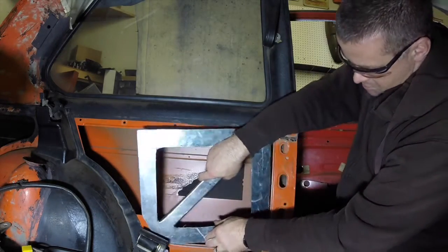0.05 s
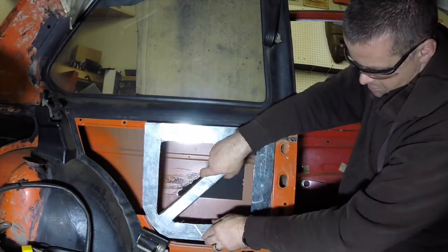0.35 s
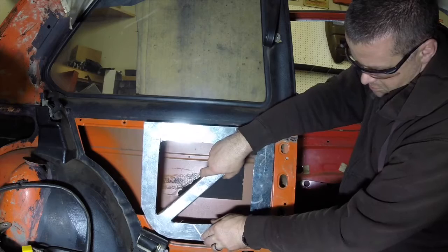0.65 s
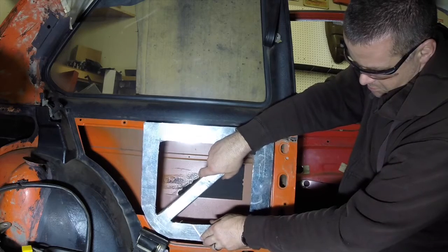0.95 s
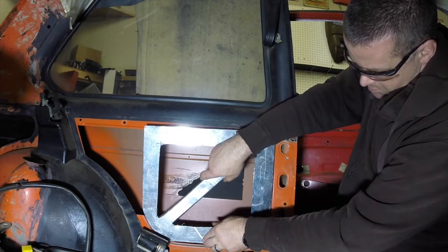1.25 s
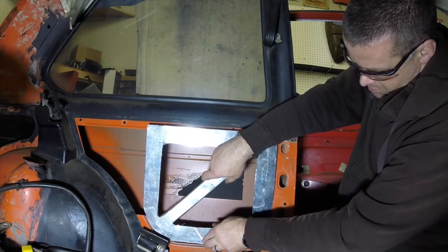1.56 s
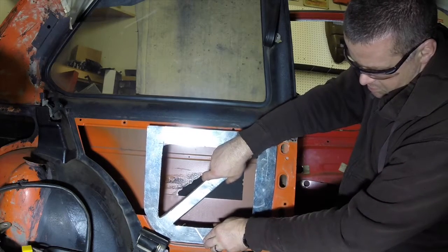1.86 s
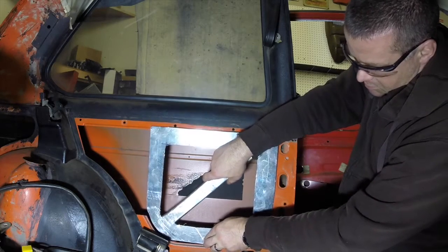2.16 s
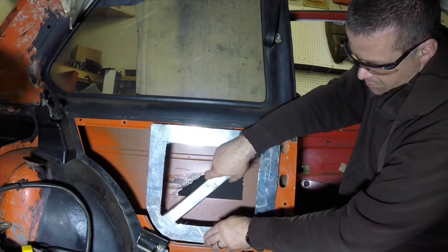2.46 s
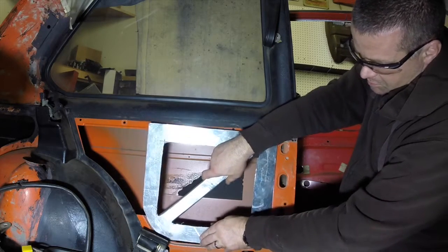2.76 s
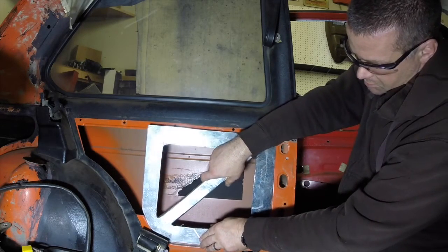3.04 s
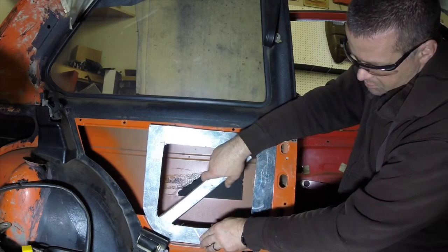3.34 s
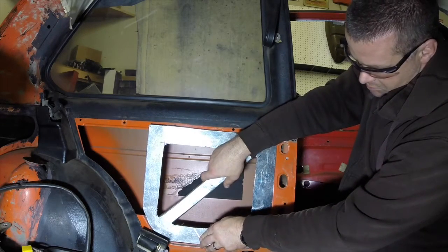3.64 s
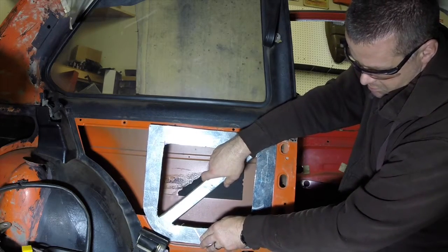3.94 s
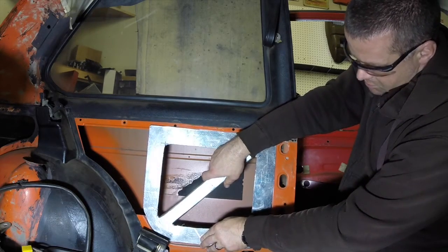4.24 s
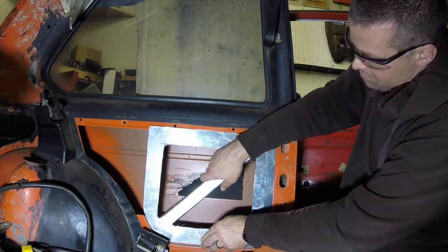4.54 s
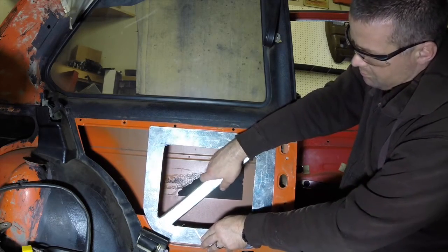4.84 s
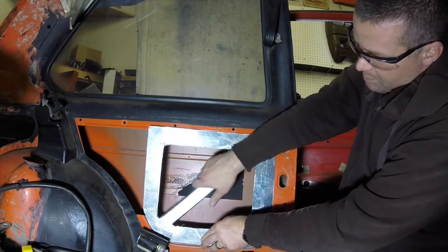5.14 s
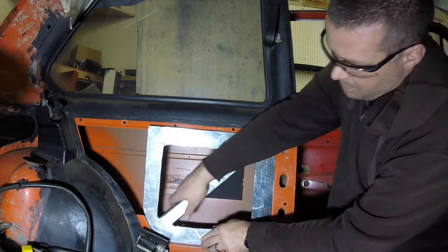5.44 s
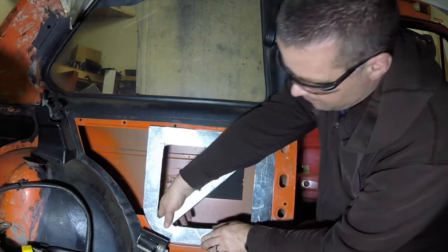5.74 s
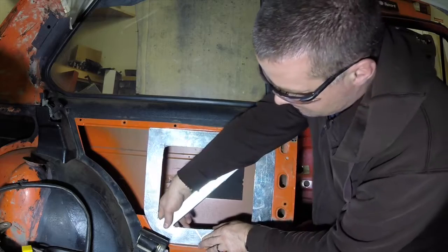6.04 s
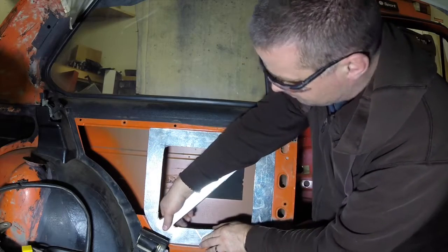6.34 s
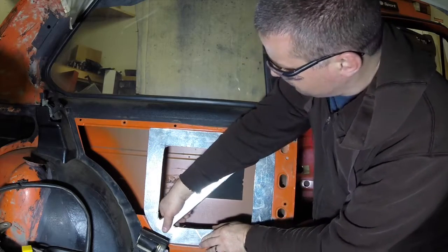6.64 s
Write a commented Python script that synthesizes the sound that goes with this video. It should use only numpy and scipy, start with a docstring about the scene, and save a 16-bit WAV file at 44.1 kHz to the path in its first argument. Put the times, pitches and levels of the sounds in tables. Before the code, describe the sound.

Irregular metallic knocks and scrapes sound close by as a brace is shifted against a hollow car body panel. The metal rings briefly while loose, and the panel booms when pressed. The knocks come in clusters, with dull rubbing between them and a faint hiss of a palm sliding on metal before a deep thump near the end. A short garage reverberation and quiet room noise lie underneath.

```python
"""Fitting a brace into a car body.

In a garage, a sheet-metal brace is shifted and pressed into the side panel of a bare body shell.
Each knock shakes panel and cabin: the brace rings while loose, the panel booms once it is pressed.
Edges scrape in tiny slips, rubbing comes and goes, a palm slides. Hard blows overload the microphone."""
import sys
import numpy as np
from scipy import signal
from scipy.fft import rfft, irfft, next_fast_len
from scipy.io import wavfile
from scipy.ndimage import uniform_filter1d

SR = 44100
rng = np.random.default_rng(int(sys.argv[2]) if len(sys.argv) > 2 else 0)


def master(y):
    """Save y as 16-bit WAV."""
    cut = np.clip(np.atleast_2d(y).T, -1, 1)
    pcm = np.round(cut * 32767)  # scale
    wavfile.write(sys.argv[1], SR, pcm.astype(np.int16))


N = 295293
RING_SAMPLES = 32768
STRIKE_SPREAD_DB = 3.5  # scatter per mode and per slip

# garage background (frequency [Hz], relative density [dB])
AIR_SPECTRUM = [(12, -29), (20, 1.5), (95, -2), (219, -7.5), (744, -6.5), (809, -10.5), (1260, -10.5),
                (1490, -14.5), (2080, -16), (2680, -19.5), (3160, -21), (6710, -33), (8860, -39),
                (14200, -45.5), (15400, -58)]
# palm on the brace (start [s], length [s], level [dB])
PALM_STROKES = [(0.84, 0.49, -75), (5.02, 0.12, -62), (5.36, 0.5, -53.5), (6.32, 0.04, -53.5)]
# skin friction (frequency [Hz], relative density [dB])
SKIN_SPECTRUM = [(500, -20), (2500, 11), (6000, 7), (11000, -1), (15000, -16)]
# rubbing; the loudest is a rough noise under the juddering knocks (start [s], length [s], level [dB])
RUB_STROKES = [(1.007, 0.27, -44), (1.641, 0.09, -35.5), (1.947, 0.31, -28), (3.892, 0.16, -45),
               (4.55, 0.42, -43.5), (4.973, 0.45, -38.5), (5.337, 1, -38.5), (6.1, 0.33, -42)]
# rubbing noise (frequency [Hz], relative density [dB])
RUB_SPECTRUM = [(100, 6.5), (400, 23), (1200, 13), (3000, 2.5), (7000, -16.5), (11500, -23.5),
                (16000, -28.5)]
# garage reverberation (frequency [Hz], t60 [s])
GARAGE_T60 = [(60, 0.27), (350, 0.99), (1200, 0.39), (4000, 0.31), (12000, 0.22)]
# dense body-shell modes (frequency [Hz], relative density [dB])
SHELL_SPECTRUM = [(30, -38), (60, -9.5), (120, 2.5), (175, -11.5), (215, -17), (270, 4.5), (380, 0),
                  (520, -2), (680, -6.5), (1200, -10.5), (1530, -9.5), (2100, -13), (3200, -15.5),
                  (5000, -30.5), (10000, -53), (15400, -71.5)]
# their early decay (frequency [Hz], t60 [s])
SHELL_T60 = [(60, 0.19), (160, 0.4), (380, 0.24), (900, 0.22), (2000, 0.15), (4500, 0.1), (9000, 0.094),
             (15000, 0.095)]
# side panel (frequency [Hz], relative level [dB], t60 [s])
PANEL_MODES = [(52.6, -19.5, 1), (64.4, -8.5, 0.78), (96, -29, .5), (136, -13.5, 0.8), (187.7, -14.5, 0.26),
               (208, -6, 0.12), (266.7, 1, 0.17), (311.2, -4.5, 0.32), (348, -0.5, 0.32), (398.6, 4, 0.13),
               (414, 4, 0.071), (431.6, -5, 0.29)]
# loose brace (frequency [Hz], relative level [dB], t60 [s])
LOOSE_MODES = [(614, -7, .2), (678, -6, .2), (725, -9, .17), (785, -7, .18), (855, -7, .28),
               (889, -2.5, .33), (1015, -11, .22), (1124, -2.5, .3), (1186, -4.5, .28), (1238, -8, .2),
               (1418, -9, .22), (1674, -13, .18), (1782, -13, .18), (2135, -8.5, .48), (2180, -17, .22),
               (2272, -18, .2), (2728, -14, .33), (2821, -24, .75), (2912, -21, .25), (3020, -20, .2),
               (3182, -19, .2), (4339, -29, .22), (5696, -35, .35)]
# brace pressed to the panel (frequency [Hz], relative level [dB], t60 [s])
SEATED_MODES = [(495, -5, .26), (558, -8, .22), (636, -4, .2), (660, -5, .2), (700, -9, .15),
                (790, -10, .13), (860, -9, .15), (910, -9, .19), (1001, -6, .2), (1093, -6, .24),
                (1135, -6, .16), (1195, -7, .16), (1314, -9, .17), (1410, -11, .17), (1647, -10, .18),
                (1814, -9, .19), (2013, -15, .16), (2223, -15, .15), (2304, -13, .18), (2525, -15, .16),
                (3138, -19, .15), (3424, -19, .16)]
# play of the brace (time [s], freedom [0 pressed home, 1 loose])
BRACE_FREEDOM = [(0, 0.8), (1.0, 0.49), (1.3, 0.22), (2.1, 0.067), (2.3, 0.51), (2.65, 0.43), (3.0, 0.075),
                 (5.2, 0.02), (6.0, 0.43)]
# edge sliding on the panel (start [s], rise time [s], peak level [dB])
SCRAPE_STROKES = [(0.0, 0.016, -16), (0.879, 0.029, -30), (2.46, 0.14, -16), (5.03, 0.12, -38)]
# slip force (frequency [Hz], relative level [dB])
SLIP_SPECTRUM = [(100, -17), (400, 1), (900, 1), (2150, 3.5), (3300, 4), (5500, 11), (8000, 19.5),
                 (14000, 26)]
# limits of the boom, clunk, clang, edge and click bands (frequency [Hz])
KNOCK_BANDS_HZ = [40, 180, 700, 2500, 6500, 15000]
# share of a knock, one row per band, clunk to click (padded push [dB], firm blow [dB], bare edge [dB])
CONTACT_SHARES_DB = [(6, 1.5, -5.5), (-3.5, 0, 0), (-36.5, -14, -3), (-55.5, -39.5, -3)]
# panel boom at a full blow, growing as the brace is leaned on (time [s], level [dB])
FULL_BOOM = [(0.08, -33), (0.2, -30.5), (0.6, -50), (1.75, -43.5), (2.1, -32), (2.9, -36.5), (3.3, -32),
             (4.0, -31), (4.5, -26.5), (5.2, -22), (5.5, -36), (5.85, -28.5), (6.4, -21)]
# brace hitting the panel (time [s], strength [dB], hardness [0 padded push, 1 bare edge])
BRACE_KNOCKS = [(0.081, -29.5, 0.56), (0.172, -15.0, 0.65), (0.204, -11, 0.48), (0.221, -21, 0.85),
                (0.268, -22.5, 0.62), (0.324, -31.5, 0.57), (0.569, -25, 0.49), (0.729, -37, 0.22),
                (0.865, -29, 0.52), (1.125, -42.5, 0.71), (1.191, -26.5, 0.67), (1.214, -26.5, 0.2),
                (1.349, -36, 0.4), (1.403, -34.5, 0.39), (1.526, -42, 0.18), (1.721, -20.0, 0.46),
                (1.74, -25, 0.026), (1.771, -25, 0.55), (2.015, -27.5, 0.51), (2.056, -18.5, 0.3),
                (2.101, -18.5, 0.33), (2.119, -20.5, 0.04), (2.167, -21, 0.11), (2.193, -32, 0.082),
                (2.3, -17.5, 0.74), (2.33, -8.5, 0.69), (2.428, -27.5, 0.083), (2.576, -20.5, 0.77),
                (2.632, -17, 0.59), (2.884, -13, 0.096), (2.897, -23.5, 0.39), (2.958, -17, 0.62),
                (3.166, -26.5, 0.53), (3.177, -17, 0.52), (3.32, -30.5, 0.19), (3.933, -37.5, 0.4),
                (4.02, -16.5, 0.17), (4.132, -22, 0.19), (4.226, -20.0, 0.68), (4.289, -19, 0.54),
                (4.336, -27, 0.52), (4.449, -18.5, 0.55), (4.541, -18.0, 0.67), (4.71, -22.0, 0.23),
                (4.865, -41, 0.31), (5.173, -26.0, 0.04), (5.197, -13.5, 0.62), (5.406, -40.0, 0.25),
                (5.49, -34.5, 0.59), (5.807, -24, 0.61), (5.849, -23, 0.13), (5.947, -33.5, 0.26),
                (6.006, -7.5, 0.12), (6.021, -18.5, 0.36), (6.038, -23, 0.37), (6.138, -20.5, 0.29),
                (6.327, -45.5, 0.39), (6.429, -46, 0.086)]


def gain_of(db):
    """Decibels to amplitude."""
    return 10 ** (np.asarray(db) / 20)


def unit_rms(x):
    """Scale to rms 1."""
    return x / np.sqrt(np.mean(x ** 2) + 1e-20)


def at_hz(table, hz):
    """Table lookup over log frequency."""
    table_hz, values = np.transpose(table)
    return np.interp(np.log(hz + 1), np.log(table_hz + 1), values)


def at_time(table, time_s):
    """Table lookup over time."""
    return np.interp(time_s, *np.transpose(table))


def add(mix, start_s, sound):
    """Mix a sound in place."""
    part = mix[max(round(start_s * SR), 0):][:len(sound)]
    part += sound[:len(part)]


def colour(x, spectrum):
    """Minimum-phase filter from (frequency [Hz], gain [dB]) points."""
    size = next_fast_len(len(x) + RING_SAMPLES // 8)
    log_gain = np.log(gain_of(at_hz(spectrum, abs(np.fft.fftfreq(size, 1 / SR)))))
    response = np.exp(np.conj(signal.hilbert(log_gain)))[:size // 2 + 1]
    return irfft(rfft(x, size) * response, size)[:len(x)]


def garage_air(level_db=-43.5):
    """Steady background noise."""
    return gain_of(level_db) * unit_rms(colour(rng.standard_normal(N), AIR_SPECTRUM))


def catches(samples, smooth_samples=400):
    """Random waver of friction as a surface catches; rms 1."""
    return unit_rms(uniform_filter1d(rng.standard_normal(samples), smooth_samples))


def friction(strokes, spectrum, grain_db, smooth_samples):
    """Grainy noise; each stroke fades in, holds, fades out."""
    pressure = np.zeros(N)
    for start_s, length_s, level_db in strokes:
        add(pressure, start_s, gain_of(level_db) * signal.windows.tukey(int(length_s * SR), 0.6))
    grain = gain_of(grain_db * catches(N, smooth_samples))
    return pressure * unit_rms(colour(grain * rng.standard_normal(N), spectrum))


def palm():
    """Skin slides on bare metal: a fine hiss."""
    return friction(PALM_STROKES, SKIN_SPECTRUM, grain_db=3.0, smooth_samples=600)


def rubs():
    """Rough, dull rubbing noise between and under the knocks."""
    return friction(RUB_STROKES, RUB_SPECTRUM, grain_db=2.5, smooth_samples=400)


def diffuse_ring(t60_table, hold_s):
    """Dense modes or reflections as noise: brief hold, then decay per band."""
    hz, t, bands = signal.stft(rng.standard_normal(RING_SAMPLES), SR, nperseg=256)
    fade = np.exp(-np.log(1000) * np.maximum(t - hold_s, 0) / at_hz(t60_table, hz)[:, None])
    return signal.istft(bands * fade, SR)[1][:RING_SAMPLES]


def modal_ring(modes, spread_db, rise_s, damping=1):
    """Decaying sines; levels vary with the contact point."""
    t = np.arange(RING_SAMPLES) / SR
    hz, level_db, t60_s = np.transpose(modes)[:, :, None]
    amplitude = gain_of(level_db + spread_db * rng.standard_normal(hz.shape))
    phase = 2 * np.pi * (hz * t + rng.random(hz.shape))
    fade = np.exp(-np.log(1000) * damping * t / t60_s)
    return (amplitude * fade * np.sin(phase)).sum(0) * (1 - np.exp(-t / rise_s))


def body_shell(garage_db=-13.5, tick_db=7.5, ripple_db=3.7, ripple_step_hz=50):
    """Contact tick, dense shell modes and garage tail; onset at rms 1."""
    ring = diffuse_ring(SHELL_T60, hold_s=0.013)
    ring += gain_of(garage_db) * diffuse_ring(GARAGE_T60, hold_s=0.0068)
    ring[0] += gain_of(tick_db)
    # each contact point feeds some resonances and misses others, more so above the bass
    hz = np.arange(0, SR / 2, ripple_step_hz)
    coupling_db = ripple_db * hz / (hz + 400) * rng.standard_normal(len(hz))
    ring = colour(ring, np.transpose([hz, at_hz(SHELL_SPECTRUM, hz) + coupling_db]))
    return ring / np.std(ring[:RING_SAMPLES // 16])


def metal_response(time_s, shell_db, seated_db=2.0, grip=0.95):
    """Shell, brace and panel after one contact; pressing trades loose modes for seated ones."""
    freedom = at_time(BRACE_FREEDOM, time_s)
    damping = 1 + grip * (1 - freedom)  # pressure chokes the loose ring
    shell = gain_of(shell_db) * body_shell()
    loose = np.sqrt(freedom) * modal_ring(LOOSE_MODES, STRIKE_SPREAD_DB, rise_s=0.00057, damping=damping)
    seated = np.sqrt(1 - freedom) * modal_ring(SEATED_MODES, STRIKE_SPREAD_DB, rise_s=0.0032)
    panel = modal_ring(PANEL_MODES, spread_db=4.5, rise_s=0.0079)
    return shell + loose + gain_of(seated_db) * seated + panel


def scrapes(slips_per_s=350, swell_db=13.5, release_db_per_s=303, catch_db=2.5):
    """Irregular edge slips keep the metal ringing; each stroke swells, catches, lets go."""
    out = np.zeros(N)
    samples = RING_SAMPLES // 2
    t = np.arange(samples) / SR
    for start_s, rise_s, peak_db in SCRAPE_STROKES:
        force_db = peak_db + np.minimum(swell_db * (t / rise_s - 1), release_db_per_s * (rise_s - t))
        slip_db = catch_db * catches(samples) + STRIKE_SPREAD_DB * rng.standard_normal(samples)
        signs = rng.choice([-1, 1], samples)
        slipping = rng.random(samples) < slips_per_s / SR
        force = gain_of(force_db) * unit_rms(gain_of(slip_db) * signs * slipping)
        ring = colour(metal_response(start_s, shell_db=-6.5), SLIP_SPECTRUM)
        add(out, start_s, signal.fftconvolve(force, ring / np.linalg.norm(ring)))
    return out


def knock(time_s, strength_db, hardness, full_blow_db=-23.5, boom_slope=0.93, thud=0.23, roll_off=0.36):
    """A padded push feeds the low bands, a bare edge the high ones; the panel booms under both."""
    ring = metal_response(time_s, shell_db=0.0)
    onset = ring[:RING_SAMPLES // 16]
    hz, power = signal.periodogram(onset, SR, window=("tukey", 0.1), scaling="spectrum")
    onset_db = 10 * np.log10(np.histogram(hz, KNOCK_BANDS_HZ, weights=power)[0])
    contact_db = [strength_db + np.interp(hardness, [0, 0.5, 1], band) for band in CONTACT_SHARES_DB]
    # the panel gives only so far: no more boom beyond a full blow
    panel_db = at_time(FULL_BOOM, time_s) + boom_slope * min(strength_db - full_blow_db, 0)
    boom_db, clunk_db, clang_db, edge_db, click_db = np.append(panel_db, contact_db) - onset_db
    low_db = clunk_db + thud * (clunk_db - clang_db)  # softer blows sit lower
    low_db -= 9 * at_time(BRACE_FREEDOM, time_s) ** 2  # a loose brace loads the panel less
    upper_db = clang_db + roll_off * (edge_db - clang_db)
    return colour(ring, [(115, boom_db), (220, low_db), (450, clunk_db), (850, clang_db),
                         (1800, upper_db), (3400, edge_db), (9000, click_db)])


def knocks():
    """The brace hits the panel as it is worked into place."""
    out = np.zeros(N)
    for time_s, strength_db, hardness in BRACE_KNOCKS:
        add(out, time_s, knock(time_s, strength_db, hardness))
    return out


def scene():
    """All sources at one microphone."""
    return (knocks() + scrapes() + rubs() + garage_air() + palm())[None]


def record(dry):
    """Overload clips at full scale; a low-pass follows."""
    cutoff_hz = 15600
    lowpass = signal.firwin(511, cutoff_hz, window=("kaiser", 9), fs=SR)
    return signal.oaconvolve(np.clip(dry, -1, 1), lowpass[None], "same")


dry = scene()
out = record(dry)
master(out)
```